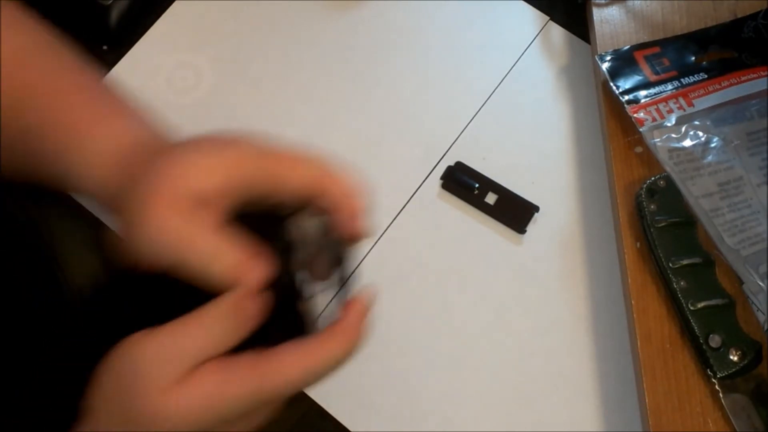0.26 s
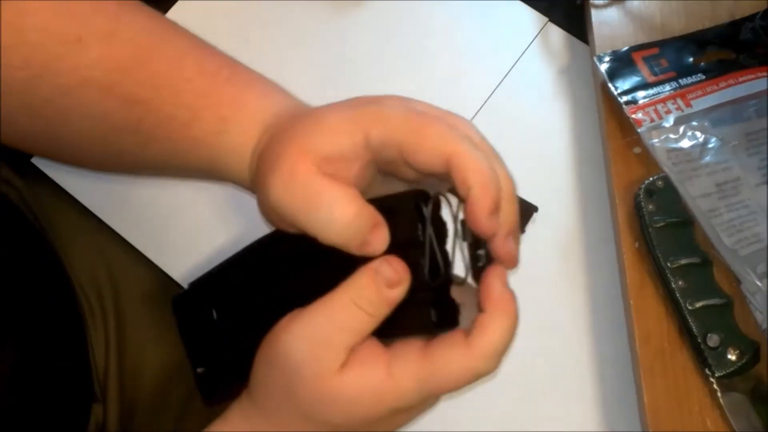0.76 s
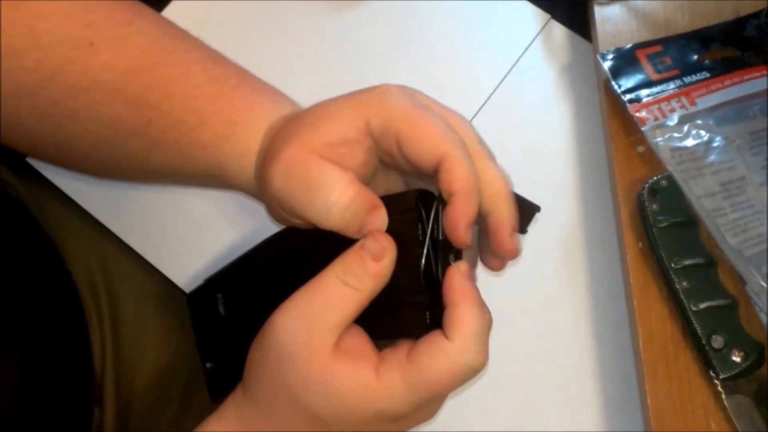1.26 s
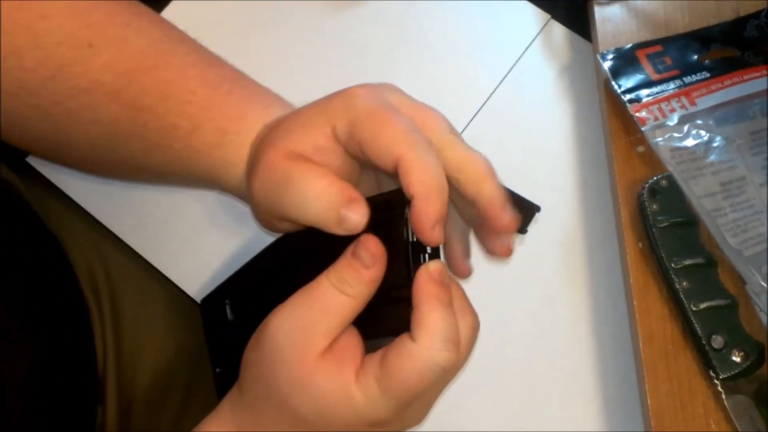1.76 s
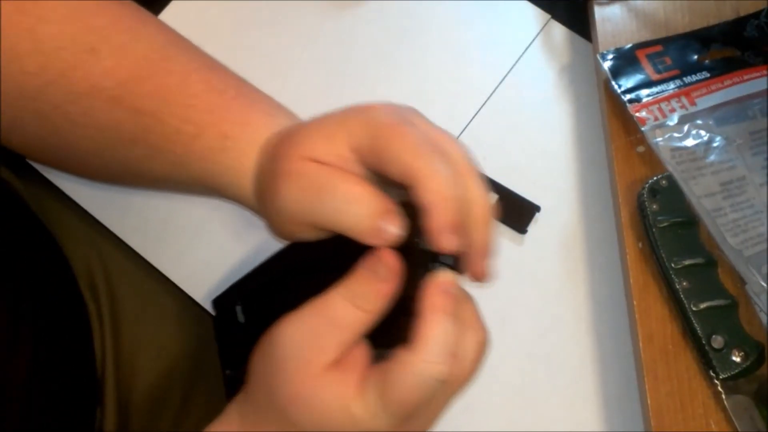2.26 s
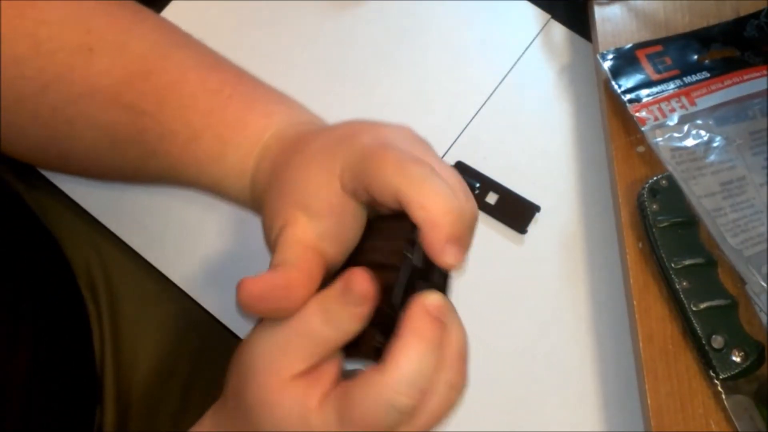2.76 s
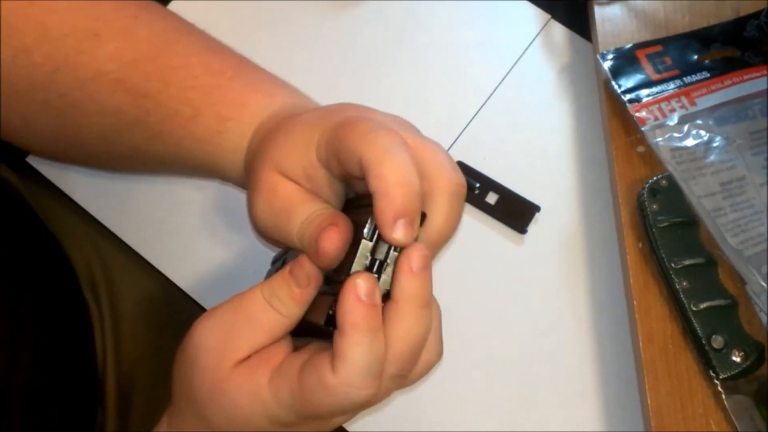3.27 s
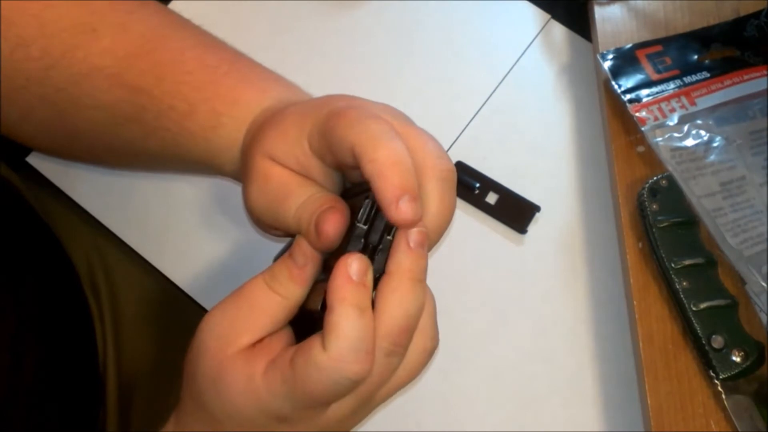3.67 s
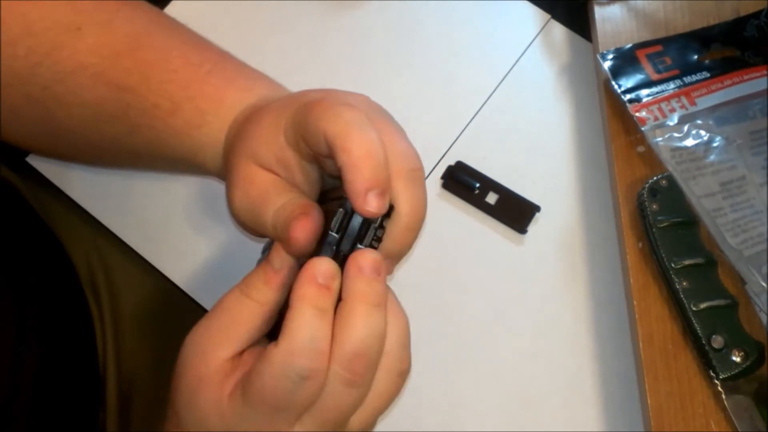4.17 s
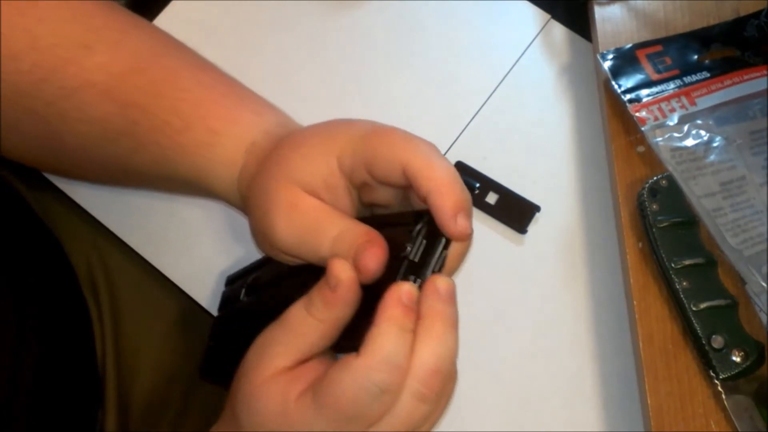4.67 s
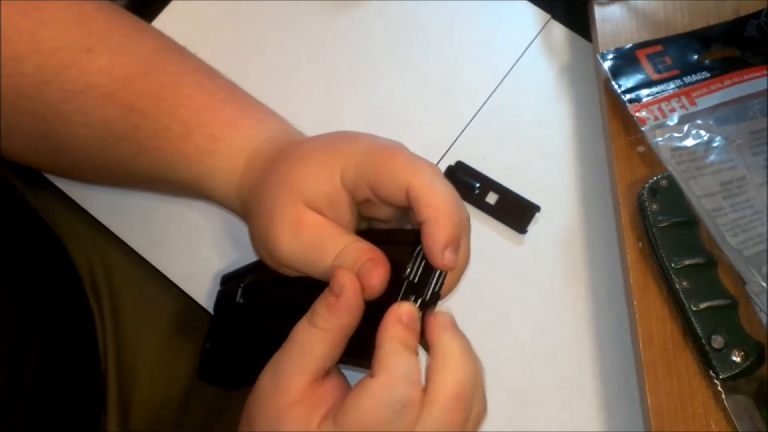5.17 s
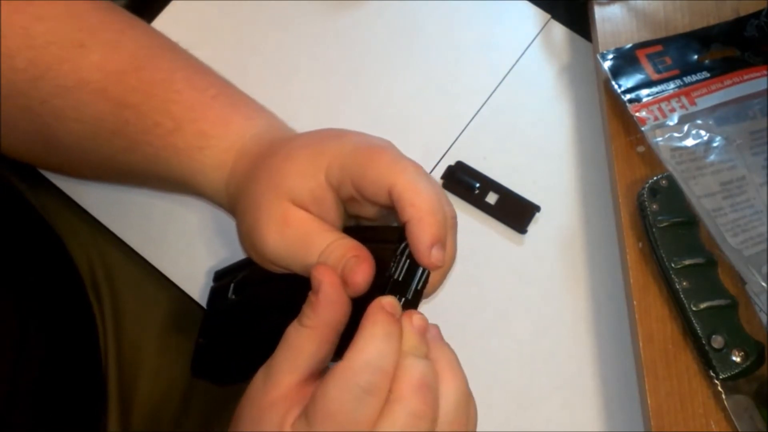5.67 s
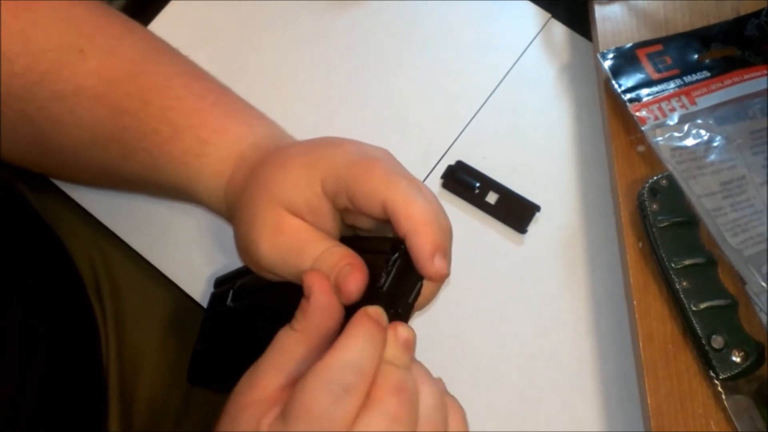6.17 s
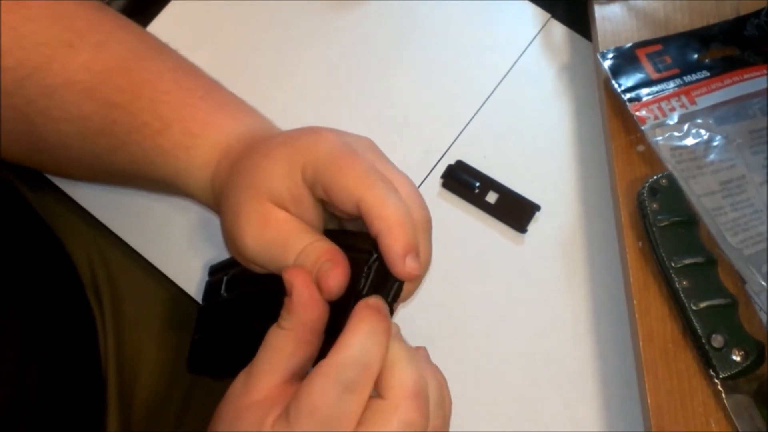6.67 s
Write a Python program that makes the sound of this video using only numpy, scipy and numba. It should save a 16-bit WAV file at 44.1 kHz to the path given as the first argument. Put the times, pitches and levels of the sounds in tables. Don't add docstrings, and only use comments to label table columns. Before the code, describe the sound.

Close up at a table, hands push a coil spring into a hollow sheet-steel magazine. Sharp metallic snaps and short scrapes crowd the first two seconds, loudest just before one second, with loose coils buzzing briefly. Then come tiny ticks, a few clicks around three to four seconds, and sparse soft snaps near six. Low room rumble, faint hiss and a distant fan continue beneath.

```python
import sys
import numpy as np
from scipy import signal
from scipy.fft import rfft, irfft
from scipy.io import wavfile
from numba import njit

SR = 44100
rng = np.random.default_rng(int(sys.argv[2]) if len(sys.argv) > 2 else 0)


def natural_amplitude(level_db):
    exponent = np.asarray(level_db, float) / 20
    return 10 ** exponent


def to_wav(s):
    ch = np.atleast_2d(s).T
    pcm = np.round(np.clip(ch, -1, 1) * 32767)
    wavfile.write(sys.argv[1], SR, pcm.astype(np.int16))


N = 305613

# frequency in Hz, level in dB per Hz.
RUMBLE_AND_HISS = [(12, -47.5), (20, -30), (27, -34), (53, -19), (91, -18), (128, -7), (230, -7),
                   (372, -15), (551, -17.5), (616, -21.5), (709, -23), (1600, -35), (5670, -45),
                   (15200, -44.5), (16500, -56.5)]
# frequency in Hz, side minus mid in dB.
NOISE_SIDE = [(60, -6), (110, -13.5), (200, -13), (380, -13.5), (700, -7.5), (1290, -1), (2380, -0.5),
              (4400, 1.5), (8120, 0), (15000, -1.5)]
# frequency in Hz, width in Hz, level in dB.
FAN_LINES = [(140, 12, -61), (237, 25, -66), (700, 20, -74), (1303, 8, -82)]
# time in seconds, cavity peak in dB, brightness in dB,
# cavity pitch in Hz set by the grip, favoured wall mode in Hz.
SNAPS = [(0.002, -24.5, -10, 847, 2510), (0.143, -20, -2.5, 872, 1740), (0.192, -14.5, -12.5, 887, 2570),
         (0.351, -29.5, -5.5, 913, 1830), (0.661, -25, -8.5, 900, 1900), (0.69, -25, -17, 901, 2730),
         (0.809, -9.5, -3.5, 919, 2740), (0.87, -6.5, -4, 904, 1630), (0.952, -6.5, -1, 1069, 3630),
         (1.196, -20, -12, 843, 2696), (1.371, -21, -30, 830, 1790), (1.444, -10.5, -1, 900, 3402),
         (1.62, -23.5, -7.5, 890, 3290), (1.703, -23.5, 1, 1070, 1640), (2.022, -31, -0.5, 1082, 1780),
         (2.07, -29, -11.5, 1097, 1980), (3.096, -39, -6.5, 956, 3373), (3.256, -21, -5, 1035, 4794),
         (3.988, -23.5, -2, 900, 1670), (4.021, -13, -1, 1076, 4210), (4.355, -32.5, -6.5, 1072, 1700),
         (5.655, -23, 1.5, 900, 2596), (5.922, -22, 1.5, 848, 4474), (6.236, -31, -17, 900, 2670)]
# time in seconds,
# cavity peak in dB, brightness in dB, favoured wall mode in Hz.
REBOUNDS = [(0.146, -18, 5, 3450), (0.154, -11.5, 1, 3740), (0.165, -11.5, -5.5, 2580),
            (0.237, -22, -7.5, 2630), (0.369, -37, -5.5, 1830), (0.7, -26.5, -17, 1790),
            (0.814, -8, -3, 2623), (0.822, -6, -1, 1830), (0.874, -8, 3, 1764), (0.883, -6, -2, 1063),
            (0.889, -12.5, -6, 2630), (1.205, -23, -22.5, 1850), (1.452, -14.5, 0, 3390),
            (1.647, -59.5, -2, 4090), (1.716, -13, -5.5, 2550), (2.081, -34, -11.5, 2550),
            (3.105, -29.5, -22, 1990), (3.995, -21.5, -4.5, 1750), (4.043, -31.5, 5, 2500),
            (6.241, -37, -23.5, 2690)]
# time in seconds,
# cavity peak in dB, brightness in dB, cavity pitch in Hz.
TICKS = [(0.037, -24.5, -14, 696), (0.445, -45, -3, 906), (0.642, -36.5, -13, 900), (1.314, -41, -28, 843),
         (2.197, -53, -2.5, 660), (2.32, -35.5, -4, 900), (2.493, -52, -6.5, 844), (2.598, -41, -27, 873),
         (2.738, -41, -13, 892), (2.905, -41, -23, 920), (2.941, -39.5, -21, 880), (3.075, -41.5, -4, 960),
         (3.203, -44.5, -6.5, 950), (3.554, -49, -16.5, 1032), (4.611, -57, -9, 727),
         (4.834, -38, -18, 692), (5.018, -42.5, -21, 666), (5.293, -46, -6, 907), (5.388, -43.5, -24, 887),
         (6.366, -53.5, -17.5, 1024), (6.503, -51.5, -17, 694), (6.624, -47.5, -14, 1060),
         (6.919, -34.5, -9.5, 626)]
# start, strongest moment and end in seconds,
# cavity level in dB, wire level above it in dB.
RUBS = [(0.013, 0.042, 0.15, -53, 6.5), (0.11, 0.119, 0.16, -31, -13.5), (0.17, 0.232, 0.23, -18.5, -10),
        (0.32, 0.334, 0.48, -35, -3.5), (0.33, 0.37, 0.44, -39, -9.5), (0.632, 0.706, 0.81, -35.5, -5),
        (0.749, 0.789, 0.79, -30, -9.5), (0.95, 1.0, 1.107, -18, -4.5), (1.167, 1.197, 1.27, -34, -4.5),
        (1.279, 1.311, 1.306, -34, -14), (1.347, 1.364, 1.369, -26, -9), (1.431, 1.44, 1.442, -22, -4),
        (1.684, 1.718, 1.843, -23, 2), (1.46, 1.468, 1.567, -18, -3.5), (1.73, 1.77, 1.79, -23, -16),
        (4.04, 4.042, 4.18, -31, -1.5), (2.574, 2.612, 2.95, -55, -16), (2.708, 2.74, 2.82, -54, -14.5),
        (2.867, 2.914, 3.2, -57, -9), (3.05, 3.1, 3.19, -42.5, -4.5), (3.235, 3.25, 3.254, -39, -3.5),
        (6.227, 6.23, 6.25, -33, -4)]
# pitch in Hz, level in dB,
# time to fall by 60 dB in seconds.
STEEL_MODES = [(645, -10, .07), (715, -10, .05), (785, -8, .055), (904, -2, .065), (978, -6, .05),
               (1075, -3, .06), (1238, -17, .05), (1720, -3, .045), (1830, -1, .05), (1965, -4, .04),
               (2265, -8, .04), (2550, 0, .05), (2680, 0, .05), (3320, -4, .035), (3425, -2, .04),
               (3550, 0, .045), (4250, -3, .035), (4490, -4, .04), (4680, -3, .04), (5140, -5, .03),
               (5430, -4, .03), (6030, -3, .035), (6430, -6, .025), (7330, -2, .025), (7900, -2, .025),
               (9400, -4, .02)]
EDGES_HZ = [580, 1420, 3050, 6800, 10500, 17500]
CRACK_DB = [-28, 2, -2.5, -4, 3.5]
# level in dB, time to fall by 60 dB in seconds.
COIL_BUZZ = [(-32, 0.13), (-5.5, 0.11), (-4.5, 0.15), (-7.5, .15), (-4, 0.018)]
# frequency in Hz, time to fall by 60 dB in seconds, dB against direct sound.
ROOM_ECHO = [(900, 0.11, -5), (2200, 0.089, -3.5), (4800, 0.15, -7.5), (8500, 0.14, -15),
             (13000, 0.065, -7)]

# wall, wire and crack band above the brightness of a contact, in dB
SNAP_DB, REBOUND_DB, TICK_DB = (1.1, -0.06, -10), (2.5, 2.53, -6), (0.34, -5, -17.5)
THUD_DB, THUD_LATE_S, THUD_WIDE_S = 7.5, 0.036, 0.09
WANDER_DB, WANDER_S = 1.2, 0.15
SCATTER_DB, PITCH_SCATTER = 3.0, 0.007
RING_PER_DB = 0.2
FLUTTER_DB, FLUTTER_S = 4, 0.007
SKID, SKID_T60_S = 0.06, 0.016
CRACK_FADE_DB_PER_S = 1.23
FAVOURED_BAND_DB = 3
RUB_RISE_DB, RUB_FALL_DB = 22, 27.5
TICK_SPREAD_DB = 2.5
KNEE_DB, RATIO, ATTACK_S, RELEASE_S = -31, 2.6, 0.0025, 0.014


def band(x, lo_hz, hi_hz):
    return signal.sosfilt(signal.butter(3, [lo_hz, hi_hz], "bandpass", fs=SR, output="sos"), x)


def below(x, hz):
    return signal.sosfiltfilt(signal.butter(2, hz, fs=SR, output="sos"), x)


def level(x, db):
    return x * natural_amplitude(db) / np.sqrt(np.mean(x ** 2))


def on_log(table, hz):
    f, v = np.transpose(table)
    return np.interp(np.log(hz + 1), np.log(f), v)


def fading(t60, size):
    return np.exp(-np.log(1000) * np.arange(size) / SR / t60)


def rumble_db():
    t = np.arange(N) / SR
    swell = sum(np.exp(-((t - row[0] - THUD_LATE_S) / THUD_WIDE_S) ** 2) for row in SNAPS)
    knots = rng.standard_normal(N // 6000 + 2)
    wander = np.interp(t, np.arange(len(knots)) * WANDER_S, knots)
    return THUD_DB * np.tanh(swell) + WANDER_DB * wander - 5.0


def floor():
    hz = np.fft.rfftfreq(N, 1 / SR)
    mid, side = rfft(rng.standard_normal((2, N))) * natural_amplitude(on_log(RUMBLE_AND_HISS, hz))
    side = side * natural_amplitude(on_log(NOISE_SIDE, hz))
    out = level(irfft(np.array([mid + side, mid - side]), N), -55)
    for f, width, db in FAN_LINES:
        out = out + level(band(rng.standard_normal(N), f - width / 2, f + width / 2), db)
    return out + below(out, 500) * (natural_amplitude(rumble_db()) - 1)


def grip(s):
    return max(row for row in SNAPS + TICKS if row[0] < s)[3]


def contacts():
    hits = [(s, db, bright + np.array(SNAP_DB), low, hz) for s, db, bright, low, hz in SNAPS]
    hits += [(s, db, bright + np.array(REBOUND_DB), grip(s), hz) for s, db, bright, hz in REBOUNDS]
    hits += [(s, db, bright + np.array(TICK_DB), low, 1800) for s, db, bright, low in TICKS]
    return hits


def body(cavity_hz, favoured_hz, favour_db, size=9000):
    hz, db, t60 = np.transpose(STEEL_MODES)[:, :, None]
    t = np.arange(size) / SR
    luck = rng.standard_normal((4, len(STEEL_MODES), 1))
    pitch = hz * (1 + PITCH_SCATTER * luck[0])
    db = db + SCATTER_DB * luck[2]
    height = favoured_hz / 3000
    cavity = (cavity_hz, 3.0, 1.1)
    favoured = (favoured_hz, favour_db * max(height, 1), 1 + RING_PER_DB * favour_db * height)
    for f, top_db, longer in (cavity, favoured):
        nearest = np.argmin(np.abs(hz - f))
        pitch[nearest], db[nearest] = f, top_db
        t60[nearest] = t60[nearest] * longer
        luck[1, nearest] /= 3
    turn = 2 * np.pi * pitch * t
    gap = np.minimum(0.2 + hz / 5000, 1.4) * luck[1]
    ring = natural_amplitude(db) * np.sign(luck[3]) * fading(t60, size)
    ring *= 1 - fading(0.0025, size)
    knots = rng.standard_normal((len(STEEL_MODES), 60))
    flutter = np.array([np.interp(t, np.arange(len(k)) * FLUTTER_S, k) for k in knots])
    ring *= natural_amplitude(FLUTTER_DB * flutter)
    ring = np.array([ring * np.sin(turn + gap / 2), ring * np.sin(turn - gap / 2)])
    noise = rng.standard_normal((3, size))
    noise = noise[0] + 0.95 * noise[1:]
    grain = natural_amplitude(3.3 * np.repeat(rng.standard_normal(size // 90), 90))
    out = []
    for lo, hi, crack_db, (buzz_db, buzz_t60) in zip(EDGES_HZ, EDGES_HZ[1:], CRACK_DB, COIL_BUZZ):
        inside = (hz[:, 0] > lo) & (hz[:, 0] < hi)
        crack = natural_amplitude(crack_db) * fading(0.014, size)
        buzz = natural_amplitude(buzz_db) * fading(buzz_t60, size) * grain
        out.append(ring[:, inside].sum(axis=1) + level(band(noise, lo, hi), 0) * (crack + buzz))
    return np.array(out)


def snaps():
    out = np.zeros((2, N + SR))
    for s, db, (wall_db, wire_db, crack_db), cavity_hz, hz in contacts():
        skid = SKID * rng.standard_normal(150) * fading(SKID_T60_S, 150)[::-1]
        skid[-1] = 1
        struck = body(cavity_hz, hz, np.clip(-0.6 * (db + 11), 1.5, 7))
        rung = signal.fftconvolve(struck, skid[None, None], axes=2)
        rung /= np.abs(rung.mean(axis=1)).max(axis=1)[:, None, None]
        crack_db = crack_db - CRACK_FADE_DB_PER_S * (s - 2)
        if hz > EDGES_HZ[2]:
            wall_db, wire_db = wall_db - FAVOURED_BAND_DB, wire_db + FAVOURED_BAND_DB
        db = db + 0.57 * (RATIO - 1) * max(db - KNEE_DB - 6.0, 0)
        band_db = np.array([-2, wall_db, wire_db, crack_db + 3.5, crack_db + 0.5])
        hit = np.tensordot(natural_amplitude(db + band_db), rung, axes=1)
        start = max(int(s * SR) - 160, 0)
        out[:, start:start + hit.shape[1]] += hit
    return out[:, :N]


def rubs():
    out, t = 0, np.arange(N) / SR
    for *s, top_db, wire_db in RUBS:
        db = top_db - np.array([RUB_RISE_DB, 0, RUB_FALL_DB])
        slips = rng.random(N) < 1500 / SR
        ticks = slips * rng.standard_normal(N) * natural_amplitude(TICK_SPREAD_DB * rng.exponential(size=N))
        cavity, wall, wire, crack, air = body(grip(s[2] + 0.01), 1830, 1.9)
        bright = wall + 0.37 * wire + 0.35 * crack + 0.15 * air
        for ring, gain_db in ((cavity, db - 2.5), (bright, db + wire_db - 2.5)):
            ring = ring / np.sqrt(np.sum(ring ** 2) / 2 * np.mean(ticks ** 2))
            push = ticks * natural_amplitude(np.interp(t, s, gain_db, left=-140, right=-140))
            out = out + signal.fftconvolve(ring, push[None], axes=1)[:, :N]
    return out


def room(x, size=20000):
    noise = rng.standard_normal((3, size))
    noise = noise[0] + 1.1 * noise[1:]
    rise = 1 - fading(0.12, size)
    tail = 0
    for lo, hi, (_, t60, db) in zip(EDGES_HZ, EDGES_HZ[1:], ROOM_ECHO):
        echoes = band(noise, lo, hi) * fading(t60, size) * rise
        tail = tail + level(echoes, db) * np.sqrt(2 * (hi - lo) / SR / size)
    return signal.fftconvolve(x.mean(axis=0)[None], tail, axes=1)[:, :N]


def scene():
    steel = band(band(snaps() + rubs(), 590, 19000), 650, 14000)
    shade = band(steel, 4000, 19000) * np.array([[-0.18], [0.18]])
    return steel + shade + room(steel) + floor()


@njit
def squeeze(loud, knee, power, attack, release):
    gain, e = np.ones(len(loud)), 0.
    for i in range(len(loud)):
        e += (loud[i] - e) * (attack if loud[i] > e else release)
        if e > knee:
            gain[i] = (knee / e) ** power
    return gain


def roll_off(x):
    return signal.sosfilt(signal.butter(12, 16810, fs=SR, output="sos"), x)


def record(dry):
    rumble = below(dry, 450)
    upper = dry - rumble
    loud = np.abs(upper).mean(axis=0)
    gain = squeeze(loud, natural_amplitude(KNEE_DB) * 1., 1 - 1 / RATIO, 1 / (ATTACK_S * SR), 1 / (RELEASE_S * SR))
    squeezed = upper * gain
    bent = rumble + squeezed + 0.12 * band(squeezed ** 2, 22, 400)
    ceiling = np.tanh(bent * 1.689) / 1.108
    top = signal.ellip(8, 0.2, 60, 16200, fs=SR, output="sos")
    return roll_off(signal.sosfilt(top, ceiling))


dry = scene()
out = record(dry)
to_wav(out)
```